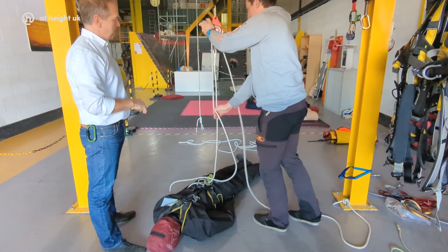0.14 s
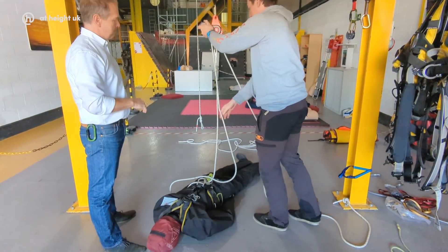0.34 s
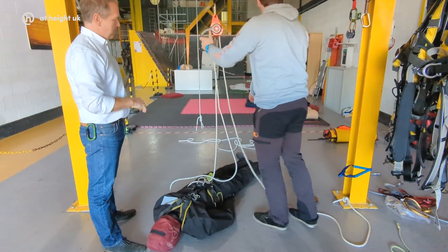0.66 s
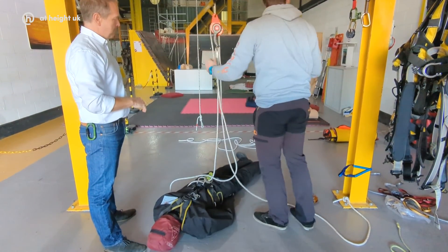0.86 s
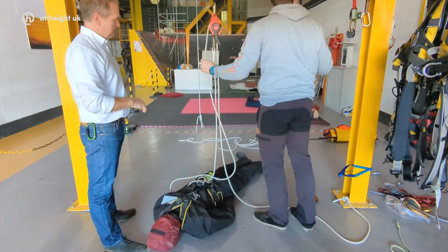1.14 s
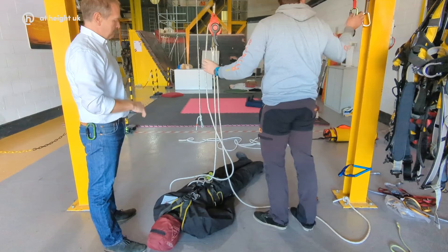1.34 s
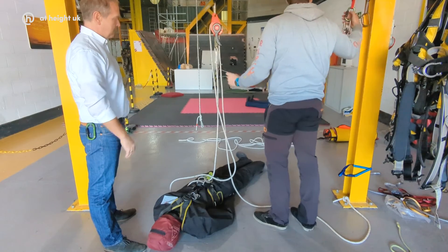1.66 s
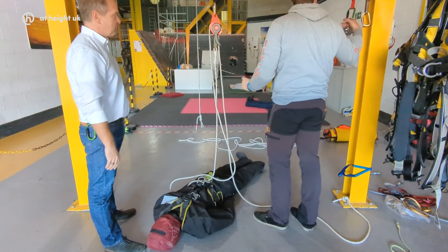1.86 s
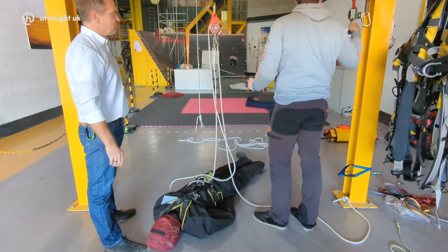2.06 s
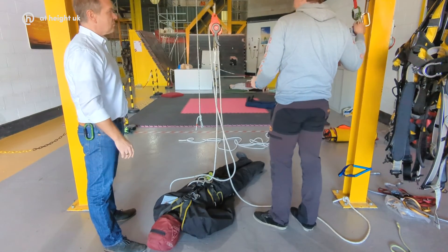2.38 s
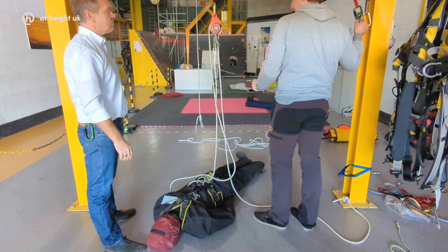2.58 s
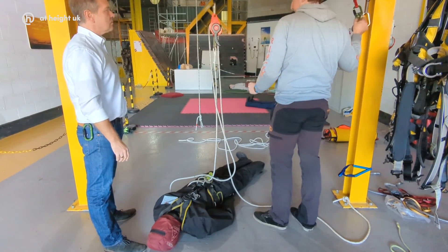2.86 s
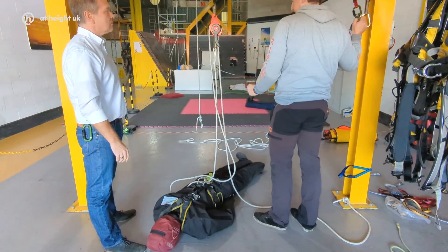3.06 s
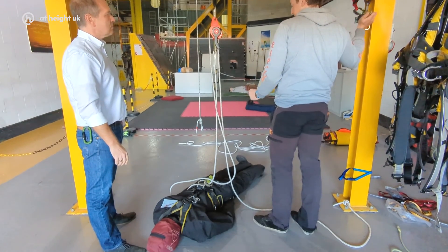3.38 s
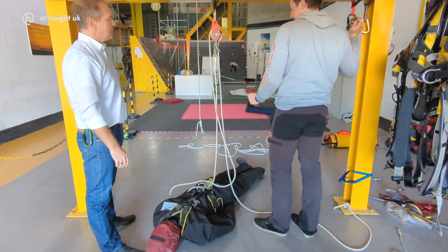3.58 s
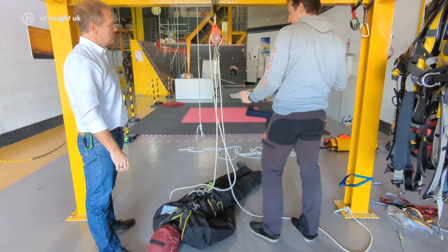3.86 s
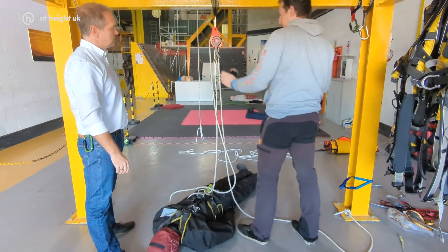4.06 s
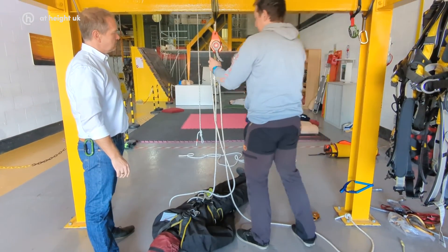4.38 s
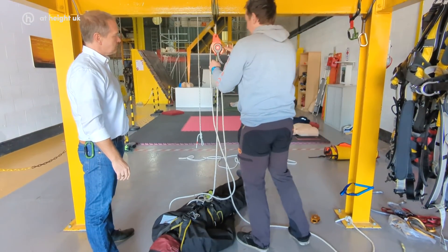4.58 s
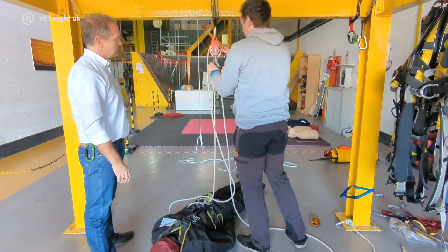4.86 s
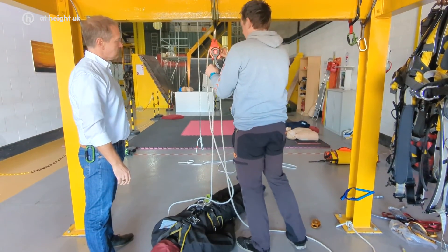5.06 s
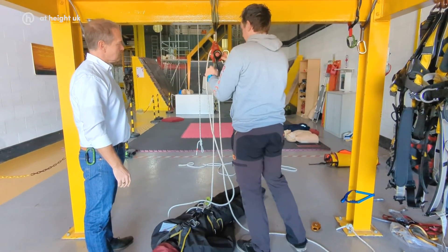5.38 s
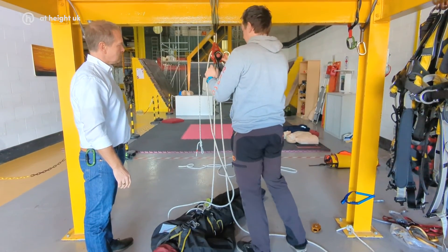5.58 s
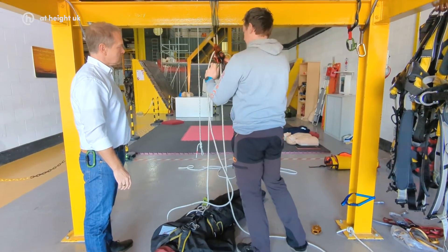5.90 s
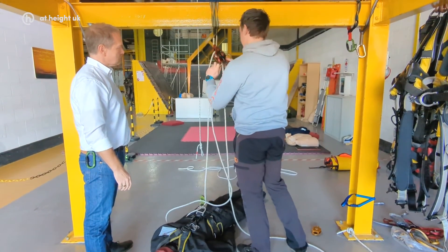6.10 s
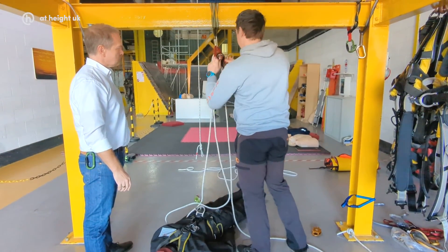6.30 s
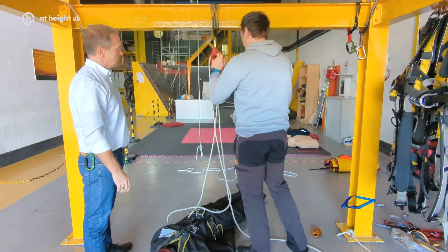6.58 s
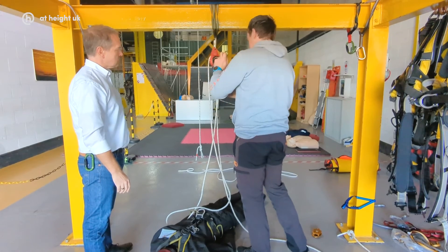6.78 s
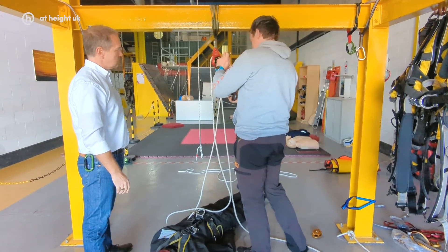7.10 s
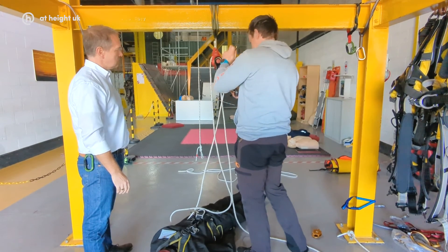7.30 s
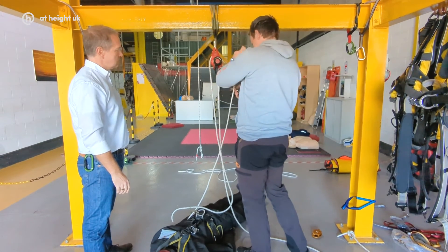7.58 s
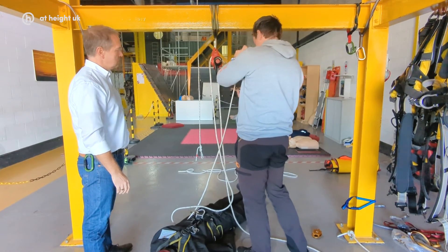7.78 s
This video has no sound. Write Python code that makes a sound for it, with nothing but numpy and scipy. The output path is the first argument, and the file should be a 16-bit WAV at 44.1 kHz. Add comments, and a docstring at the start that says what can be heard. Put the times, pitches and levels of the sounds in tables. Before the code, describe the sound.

In a reverberant, hard-walled training hall, a hanging steel fitting clangs sharply once and rings briefly. A carabiner gate then clicks irregularly under the fingers and snaps shut with a bright, bouncing, echoing crack. After a quieter gap, pulley plates clack and scrape softly while the carabiner frame clinks. Rope rustles faintly with hand movements. Two microphones a few metres away also pick up low duct rumble and airflow, slowly growing louder.

```python
"""Climbing hardware in a training hall

Two microphones stand a few metres from climbing hardware handled in a hard-walled training hall.
A hanging steel fitting clangs: noise bursts and decaying modes. A carabiner gate clicks and snaps shut:
short coloured noise. Pulley plates clack and scrape, and the carabiner frame clinks with bright modes.
Rope rustles as grainy noise with one thin squeak; a background of duct rumble and air grows louder."""
import sys
import numpy as np
from scipy import signal
from scipy.fft import rfft, irfft
from scipy.io import wavfile
from scipy.ndimage import uniform_filter1d

SR = 44100
rng = np.random.default_rng(int(sys.argv[2]) if len(sys.argv) > 2 else 0)


def pcm_store(signal):
    """Save signal as 16-bit PCM."""
    levels = np.round(np.clip(np.atleast_2d(signal), -1, 1) * 32767)
    wavfile.write(sys.argv[1], SR, levels.astype(np.int16).T)


N = 350154
TIME = np.arange(N) / SR
TOP_HZ = 16200  # the recorder's upper limit

# Blows on the hanging steel fitting: start_s, level_db, tilt_db_per_octave, chatter_ms, ring_db
FITTING_BLOWS = [(.8166, -19, -5, 4.5, -4.5), (0.8209, -13.5, -0.5, 8.7, -8.5), (0.837, -29, 6, 5, -18),
                 (1.2739, -33.5, -6, 4.7, -10)]
# Ringing modes of the fitting: pitch_hz, level_db, t60_s
FITTING_MODES = [(1033, -19, .22), (1955, -2.5, .22), (2370, -11, .06), (3051, -1.5, .32), (3455, -4, .55),
                 (4060, -13, .05), (4658, -5.5, .3), (5578, -2.5, .27), (6722, -1.5, .29), (7725, -19, .25),
                 (8280, -20, .25), (11400, -9, .03)]
# Contact noise of the fitting: frequency_hz, level_db
FITTING_CONTACT = [(250, -44.5), (520, -24.5), (1000, -6), (1450, -8), (2300, 1.5), (3600, 2), (5200, 4.5),
                   (8500, -7), (11500, -2.5), (13500, -10), (16000, -26.5)]


def steel_fitting():
    """The fitting hangs free, so it rings on after every blow."""
    out = np.zeros(N)
    for start_s, level_db, tilt, chatter_ms, ring_db in FITTING_BLOWS:
        add(out, start_s, undb(level_db) * chatter(FITTING_CONTACT, tilt, chatter_ms))
        add(out, start_s, undb(level_db + ring_db) * ring(FITTING_MODES, tilt))
    return out


# Clear clicks of the carabiner gate under the thumb: start_s, level_db, tilt_db_per_octave
GATE_CLICKS = [(1.4852, -23.5, 3.5), (1.5718, -26.5, 0), (1.779, -45, -2.5), (2.0962, -35, -5),
               (2.2516, -49, -1), (2.312, -43, -1.5), (2.5086, -46, 0), (2.5672, -48, -4.5),
               (2.786, -32.5, 2), (2.801, -26, 1.5), (2.91, -42, -1), (2.9937, -23.5, 1.5),
               (3.290, -23.5, 5), (3.4574, -35, 1.5)]
# Dense damped resonances of gate and frame: frequency_hz, level_db
GATE_CONTACT = [(300, -36), (1150, -17.5), (1650, -6.5), (2080, -0.5), (2900, -2), (4000, 3.5), (5100, 1),
                (5950, 12), (6650, 0.5), (8400, -6.5), (10400, -4), (11600, -4), (14500, -13.5),
                (16000, -11.5)]
GATE_CHATTER_MS = 3.8  # decay time constant of a firm click
# Faint random ticks between the clicks, as the fingers fumble
FUMBLE_START_S, FUMBLE_END_S = 1.4, 3.4
FUMBLE_DB, FUMBLE_SPREAD_DB, FUMBLE_TILT_DB = -55, 3.5, -4  # tilt is per octave


def gate_clicks(count=12):
    """The thumb works the gate: clear clicks with faint ticks scattered between them."""
    slots = (np.arange(count) + rng.random(count)) / count
    times = FUMBLE_START_S + slots * (FUMBLE_END_S - FUMBLE_START_S)
    ticks = [(s, FUMBLE_DB + FUMBLE_SPREAD_DB * rng.standard_normal(), FUMBLE_TILT_DB) for s in times]
    return held_part(touches(GATE_CLICKS + ticks, GATE_CHATTER_MS), GATE_CONTACT)


# The gate springs shut, bounces and buzzes: start_s, level_db, tilt_db_per_octave, chatter_ms
SNAP_HITS = [(3.596, -40, 3, 8), (3.6063, -11.5, 2.5, 5.8), (3.6125, -18.5, 3, 4.4), (3.6245, -13.5, 2, 2),
             (3.628, -32.5, 3.5, 20)]
# Resonances of the whole jarred carabiner: frequency_hz, level_db
SNAP_CONTACT = [(300, -34.5), (1150, -15.5), (1650, -10.5), (2070, 5.5), (2900, -3.5), (5100, -1),
                (5900, 4.5), (6900, -8.5), (7500, -0.5), (8600, -8), (10400, 1), (11100, -2), (14500, -8.5),
                (16000, -14.5)]


def gate_snap():
    """The spring throws the gate against the frame, and its bounces jar the whole carabiner."""
    return held_part(SNAP_HITS, SNAP_CONTACT)


# Clacks of the pulley side plates: start_s, level_db, tilt_db_per_octave
PLATE_CLACKS = [(5.042, -39.5, -3.5), (5.4925, -32, -1), (5.604, -31.5, 5), (6.054, -40.5, 6),
                (6.1712, -25, 4), (6.2325, -19, -0.5), (6.488, -25.5, 0.5), (6.88, -44, -4.5),
                (6.942, -45, -5), (7.2124, -43, -3.5), (7.4815, -56, 10)]
# Resonances of the plates: frequency_hz, level_db
PLATE_CONTACT = [(300, -34), (1100, -12), (2400, 8), (3400, -3), (4450, 5), (5300, -3), (6600, 2),
                 (8200, -12), (12000, -18), (16000, -34.5)]
PLATE_CHATTER_MS = 3.8  # decay time constant of a firm clack
# The carabiner scrapes through the eye of the pulley: one rub on the plates, tilt per octave
SCRAPE_S, SCRAPE_HOLD_S, SCRAPE_DB, SCRAPE_TILT_DB = 6.16, 0.075, -49, -8


def pulley_plates():
    """The plates clack together, and the carabiner scrapes as it is threaded through them."""
    clacks = held_part(touches(PLATE_CLACKS, PLATE_CHATTER_MS), PLATE_CONTACT)
    scrape = colour(rng.standard_normal(N), PLATE_CONTACT, SCRAPE_TILT_DB)
    scrape = scrape * rub(SCRAPE_S, SCRAPE_HOLD_S, attack_s=0.024, release_s=.03)
    return clacks + undb(SCRAPE_DB) * scrape


# Clinks of the carabiner frame; place runs from 0 (nose) to 1 (spine):
# start_s, level_db, tilt_db_per_octave, chatter_ms, ring_db, place
CLINKS = [(0.027, -43, -8, 4, -10.5, .8), (6.0401, -37, -3.5, 3.7, -2.5, 0.53),
          (6.299, -36, -1.5, 5.8, -0.5, 0.4), (6.3398, -25.5, -2, 2.3, 7, 0.1),
          (6.459, -19, .5, 4.5, -0.5, 0.93)]
# Ringing modes of the frame: pitch_hz, level_at_nose_db, level_at_spine_db, t60_s
FRAME_MODES = [(3955, -19, 1.5, .12), (4760, -6, -5, .07), (6000, -17, -12, .06), (7405, -1.5, -2, .13),
               (7770, -22, -8, .08), (8240, -21, -7, .08), (8597, -8, -9, .1), (9005, -18, -4, .1),
               (10730, -26, -14, .1), (11640, -1, 2, .05), (12700, -4, -12, .05), (14960, -16, -11, .1)]
# Contact noise of the frame: frequency_hz, level_db
FRAME_CONTACT = [(400, -18.5), (1500, -12.5), (3000, 6.5), (6000, 0.5), (8500, 5), (12000, -1),
                 (16000, -42.5)]


def carabiner_frame():
    """The place of the blow decides how strongly each mode of the frame sounds."""
    out = np.zeros(N)
    for start_s, level_db, tilt, chatter_ms, ring_db, place in CLINKS:
        modes = [(hz, nose + place * (spine - nose), t60) for hz, nose, spine, t60 in FRAME_MODES]
        add(out, start_s, undb(level_db) * chatter(FRAME_CONTACT, tilt, chatter_ms))
        add(out, start_s, undb(level_db + ring_db) * ring(modes, tilt))
    return out


# Rope and sleeves, one rub for each move of the hands: full_speed_s, hold_s, level_db
RUBS = [(1.3, 0.29, -61), (2.06, .1, -62.5), (2.66, 0.29, -73), (4.57, .2, -71.5), (5.02, .08, -67),
        (5.49, 0.075, -66.5), (6.16, 0.34, -56.5), (6.93, 0.079, -67), (7.9, .05, -73.5)]
# Spectrum of the rubbing fibres: frequency_hz, level_db
ROPE_SPECTRUM = [(500, -18), (2200, -1), (4400, 9.5), (7000, -4), (12000, -11), (16000, -19.5)]
RUB_ATTACK_S, RUB_RELEASE_S = 0.037, .04  # time constants of every rub
ROPE_REST_DB = -86  # the hanging rope is never quite still
# The sheave squeaks faintly, sinking in pitch as it slows
SQUEAK_S, SQUEAK_LENGTH_S = 4.69, .18
SQUEAK_HZ, SQUEAK_SAG_HZ_PER_S, SQUEAK_DB = 7000, 2900, -72


def rope(grain_db=3):
    """Fibres catch and slip with each move of the hands; the sheave gives one thin squeak as it turns."""
    speed = undb(ROPE_REST_DB)
    for full_speed_s, hold_s, level_db in RUBS:
        speed = speed + undb(level_db) * rub(full_speed_s, hold_s, RUB_ATTACK_S, RUB_RELEASE_S)
    grain = grain_db * np.tanh(walk(600)) + 2 * np.tanh(walk(21))
    slips = rng.standard_normal(N) * undb(grain)
    rustle = colour(slips / slips.std(), ROPE_SPECTRUM) * speed

    turning_s = np.clip(TIME - SQUEAK_S, 0, SQUEAK_LENGTH_S)
    hz = SQUEAK_HZ - SQUEAK_SAG_HZ_PER_S * turning_s
    wavering_hz = hz * (1 + 0.0018 * walk(80))
    squeak = np.sin(2 * np.pi * np.cumsum(wavering_hz) / SR)
    squeak = squeak * np.sin(np.pi * turning_s / SQUEAK_LENGTH_S)  # fades in and out once
    return rustle + squeak * undb(SQUEAK_DB)


# Duct rumble: frequency_hz, level_db
RUMBLE_SPECTRUM = [(24, -67.5), (34, -31.5), (48, -16), (66, 2.5), (95, -2), (140, -5.5), (260, -15),
                   (600, -69.5)]
# Air noise: frequency_hz, level_db
AIR_SPECTRUM = [(100, -8), (220, -5), (340, 3.5), (480, -5.5), (700, -2.5), (1250, -11.5), (2000, -5.5),
                (2450, -12), (3100, -26.5), (4500, -40.5), (7000, -54.5), (12000, -53), (15000, -66)]
# Level each layer rises towards, and the whole height of its rise
RUMBLE_DB, RUMBLE_RISE_DB = -50, 6.5
AIR_DB, AIR_RISE_DB = -51, 9
RISE_MIDDLE_S, RISE_WIDTH_S = 2.87, 2.1


def ventilation():
    """Background of duct rumble and air: diffuse noise, heard to flutter slightly and grow louder."""
    to_come = (1 - np.tanh((TIME - RISE_MIDDLE_S) / RISE_WIDTH_S)) / 2  # share of the rise left
    rumble_db = RUMBLE_DB - RUMBLE_RISE_DB * to_come + 1.0 * walk(15)
    air_db = AIR_DB - AIR_RISE_DB * to_come + 0.25 * walk(3.3)
    return air_noise(RUMBLE_SPECTRUM) * undb(rumble_db) + air_noise(AIR_SPECTRUM) * undb(air_db)


def air_noise(spectrum, apart_hz=900):
    """Diffuse noise: the same at both microphones in the bass, unrelated in the treble."""
    mid, side = colour(rng.standard_normal((2, N)), spectrum)
    alike = 1 / (1 + (np.fft.rfftfreq(N, 1 / SR) / apart_hz) ** 2)
    mid = irfft(rfft(mid) * np.sqrt((1 + alike) / 2), N)
    side = irfft(rfft(side) * np.sqrt((1 - alike) / 2), N)
    return np.array([mid + side, mid - side])


# Reverberation of the hall: frequency_hz, t60_s
HALL_DECAY = [(400, .8), (1300, 0.85), (3000, 1.144), (5500, 0.92), (8000, 0.81), (11000, 0.66),
              (15000, .36)]


def hall_tail(build_s=0.0011):
    """Diffuse reverberation at two microphones: noise whose high treble dies first."""
    _, t, bands = signal.stft(rng.standard_normal((2, 3 * SR // 2)), SR, nperseg=256)
    t60 = on_bins(HALL_DECAY, size=256)[:, None]
    decay = np.exp(-np.log(1000) * t / t60)
    build = 1 - np.exp(-t / build_s)
    tail = signal.istft(bands * decay * build, SR)[1]
    return tail / np.sqrt(np.sum(tail ** 2) / 2)


# What the walls send back: frequency_hz, level_db
WALL_SPECTRUM = [(2000, 0), (6000, -4.5), (16000, -3)]


def in_hall(x, lag_ms, early_db, tail_db, early_s=.014, count=80):
    """Direct sound, reaching one microphone first; scattered early reflections; then the hall."""
    response = undb(tail_db) * hall_tail()
    for channel in response:
        delay_s = 0.0012 + rng.exponential(early_s, count)
        echo = rng.standard_normal(count)
        place = (np.minimum(delay_s, 1) * SR).astype(int)
        channel[place] += undb(early_db) * echo / np.linalg.norm(echo)
    response = colour(response, WALL_SPECTRUM)
    lag = round(lag_ms * SR / 1000)  # positive: the first channel hears it later
    response[0, max(lag, 0)] += 1
    response[1, max(-lag, 0)] += 1
    return signal.fftconvolve(x[None], response, axes=1)[:, :N]


def held_part(events, body):
    """The hand damps the ring and leaves a dry click."""
    out = np.zeros(N)
    for start_s, level_db, tilt, chatter_ms in events:
        add(out, start_s, undb(level_db) * chatter(body, tilt, chatter_ms))
    return out


FIRM_DB, SOFTEN_DB = -30.5, 36.5  # a firm contact; a touch SOFTEN_DB lighter chatters twice as long


def touches(rows, firm_ms):
    """Firm contacts are crisp; lighter ones chatter longer."""
    return [(s, db, tilt, firm_ms * 2 ** ((FIRM_DB - db) / SOFTEN_DB)) for s, db, tilt in rows]


def chatter(body, tilt, ms, size=4096):
    """Metal meets metal in a burst of tiny contacts: coloured noise that dies with time constant ms."""
    t = np.arange(size) / SR
    burst = rng.standard_normal(size) * np.exp(-t * 10 ** 3 / max(ms, .5))
    return colour(burst, body, tilt)


def ring(modes, tilt, pivot_hz=4000):
    """Decaying modes in close pairs that beat 8 to 11 times a second; a higher tilt favours the high ones."""
    t = np.arange(SR) / SR
    out = 0
    for hz, db, t60 in modes:
        sign = rng.choice([-1, 1])
        beat = np.cos(2 * np.pi * rng.uniform(4.0, 5.7) * t)  # half the spacing of the pair, in Hz
        pair = sign * np.cos(2 * np.pi * hz * t) * beat
        gain = undb(db + tilt * np.log2(hz / pivot_hz))
        out = out + gain * pair * np.exp(-np.log(1000) * t / t60)
    return out


def rub(s, hold_s, attack_s, release_s):
    """Envelope of a sliding move: it gathers speed until s, holds and dies away."""
    rise = np.minimum(TIME - s, 0) / attack_s
    fall = np.maximum(TIME - s - hold_s, 0) / release_s
    return np.exp(rise - fall)


def undb(db):
    """Decibels to gain."""
    return 10 ** (np.asarray(db) / 20)


def on_bins(points, size):
    """A table over frequency, read at the bins of a transform."""
    hz, value = np.transpose(points)
    return np.interp(np.log(np.fft.rfftfreq(size, 1 / SR) + 1), np.log(hz), value)


def colour(x, points, tilt=0):
    """Causal filter with the given spectrum; white noise keeps its audible power."""
    size = x.shape[-1]
    gain = undb(on_bins([(hz, db + tilt * np.log2(hz)) for hz, db in points], size))
    audible = np.fft.rfftfreq(size, 1 / SR) < TOP_HZ
    cepstrum = irfft(np.log(gain / np.sqrt(np.mean(audible * gain ** 2))), size)
    cepstrum[1:size // 2] *= 2  # folding the cepstrum gives minimum phase
    cepstrum[size // 2 + 1:] = 0
    return irfft(rfft(x) * np.exp(rfft(cepstrum)), size)


def walk(rate):
    """Smooth chance with a spread of 1, drawn afresh rate times a second."""
    k = max(int(SR / rate), 1)
    steps = np.repeat(rng.standard_normal(N // k + 1), k)
    y = uniform_filter1d(steps, k)[:N]
    return y / y.std()


def add(track, s, sound):
    """Lay a sound into a track at time s."""
    i = max(int(s * SR), 0)
    track[i:i + len(sound)] += sound[:N - i]


def scene():
    """The gate clicks sound driest, the snap rings the hall most; each source has its own reverberation."""
    clangs = in_hall(steel_fitting(), lag_ms=-.11, early_db=-5.0, tail_db=-7.5)
    clicks = in_hall(gate_clicks(), lag_ms=.1, early_db=-9, tail_db=-7)
    snap = in_hall(gate_snap(), lag_ms=.09, early_db=-3.5, tail_db=-2.0)
    clacks = in_hall(pulley_plates(), lag_ms=-.11, early_db=-6, tail_db=-4.5)
    clinks = in_hall(carabiner_frame(), lag_ms=.14, early_db=-2.5, tail_db=-7)
    rustle = in_hall(rope(), lag_ms=-.1, early_db=1.0, tail_db=-10)
    return clangs + clicks + snap + clacks + clinks + rustle + ventilation()


def record(dry):
    """The recorder cuts the very top with a steep low-pass."""
    low_pass = signal.ellip(10, .2, 80, TOP_HZ, fs=SR, output="sos")
    return signal.sosfilt(low_pass, dry)


dry = scene()
out = record(dry)
pcm_store(out)
```